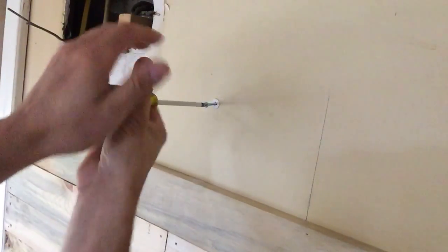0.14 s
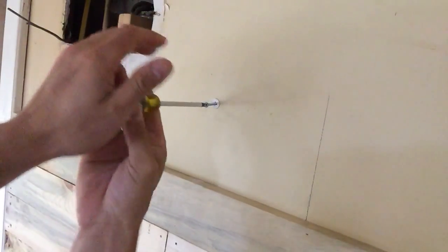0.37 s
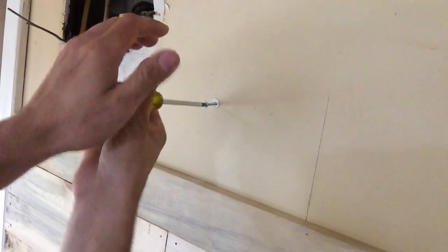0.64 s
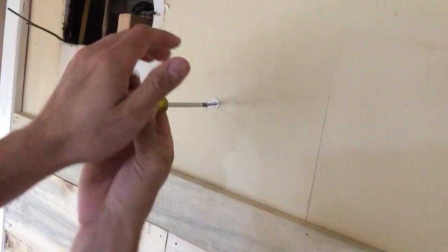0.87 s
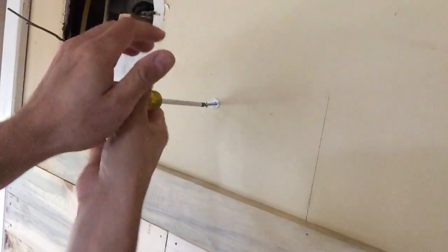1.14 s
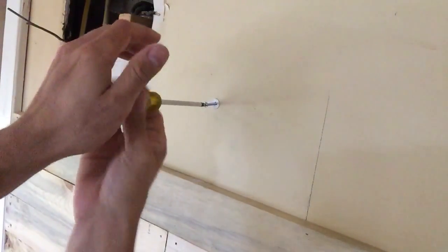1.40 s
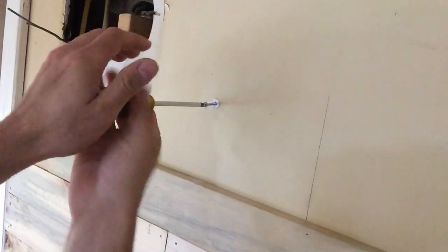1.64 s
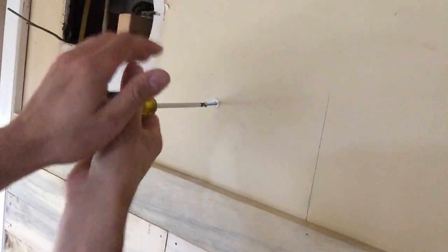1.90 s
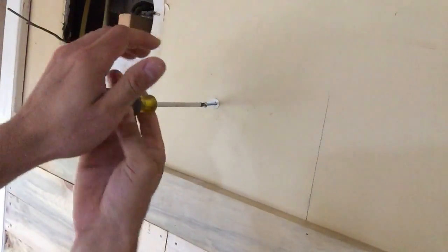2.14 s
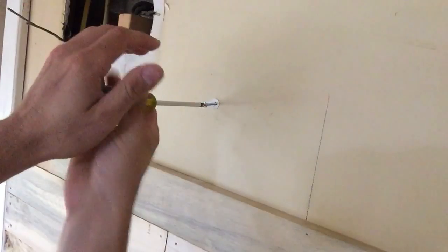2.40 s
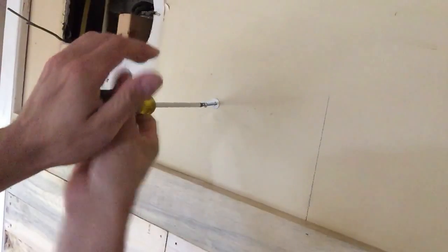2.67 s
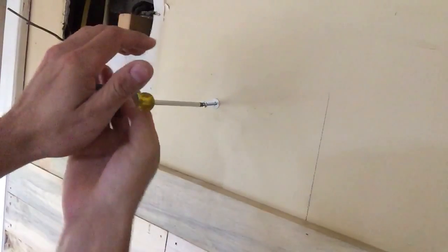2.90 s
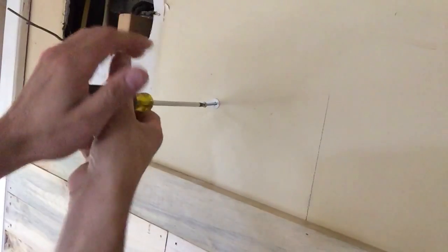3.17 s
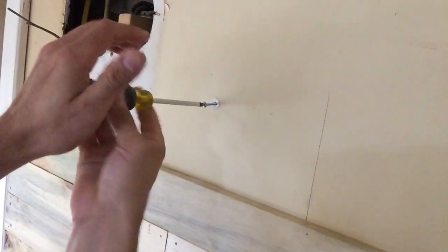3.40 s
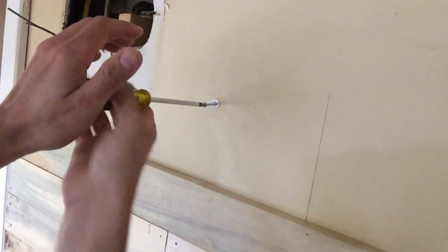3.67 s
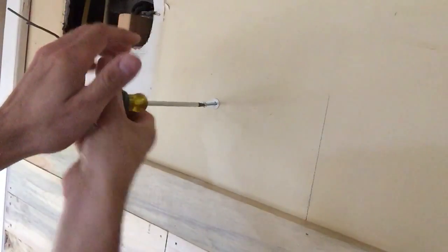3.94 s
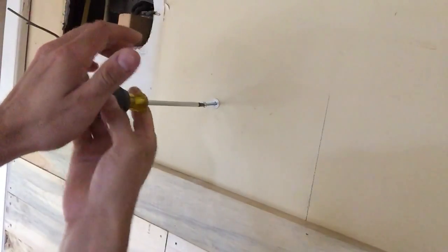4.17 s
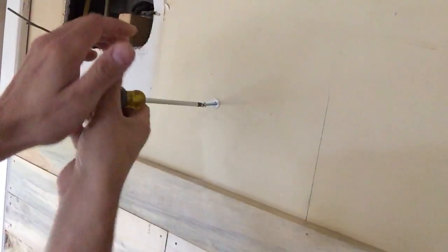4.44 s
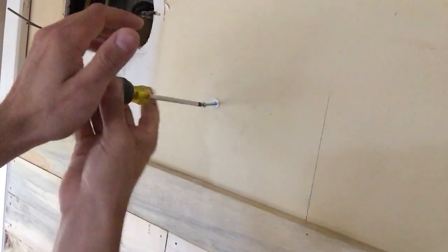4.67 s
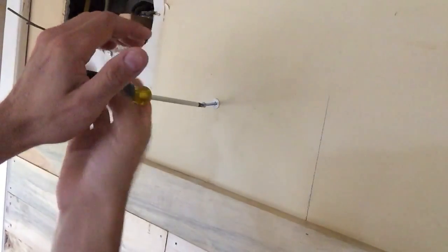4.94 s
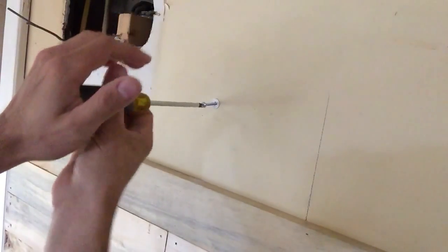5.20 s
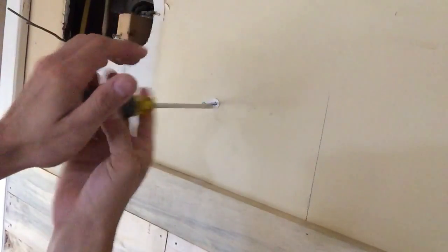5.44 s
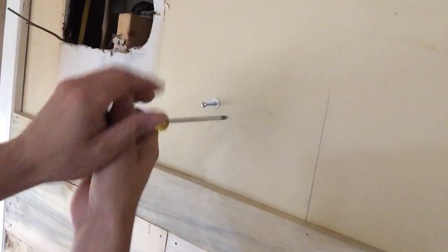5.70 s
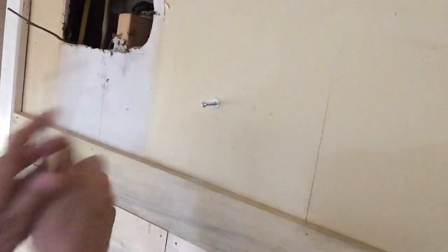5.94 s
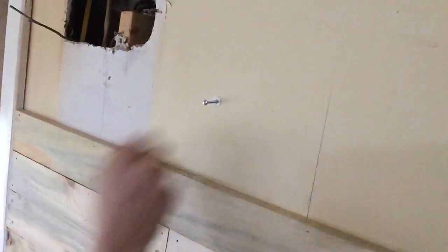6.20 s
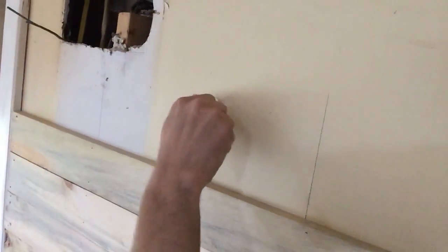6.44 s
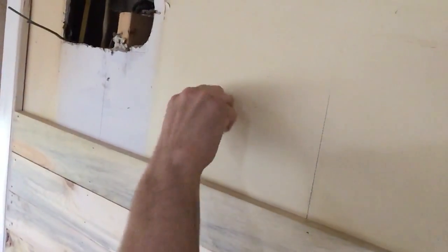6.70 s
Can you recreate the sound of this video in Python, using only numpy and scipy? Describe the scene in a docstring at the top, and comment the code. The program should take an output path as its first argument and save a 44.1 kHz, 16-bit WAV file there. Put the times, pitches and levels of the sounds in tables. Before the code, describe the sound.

Small irregular thumps and ticks come from a screwdriver tip shifting in a screw head, the thin wall answering with a short hollow resonance and the steel shank briefly pinging. Very quiet grinding fills the gaps. After five and a half seconds one hard knock stands far above the rest, followed by soft skin swishes, a low bump and faint rustling. Close microphone, small quiet room, low uneven rumble, short echo.

```python
"""Unscrewing from a hollow wall

A hand screwdriver backs a screw out of a hollow board wall in a quiet room. At each regrip the tip knocks
in the screw head: a short sagging wave makes the thump, and struck modes make the hollow ring and the clicks.
Between knocks random slips of the thread ring the wall faintly, and coloured noise makes the skin on the handle.
The tip slips out with one hard knock that dies slowly in the wall, then a fist bumps the wall and the
fingers rustle round the screw."""
import sys
import numpy as np
from scipy import signal
from scipy.fft import rfft, irfft
from scipy.io import wavfile
from scipy.ndimage import uniform_filter1d

SR = 44100
rng = np.random.default_rng(int(sys.argv[2]) if len(sys.argv) > 2 else 0)


def rack_gain(trim_db):
    """Turn a fader trim in dB into the linear factor to multiply a signal by."""
    fader = np.asarray(trim_db, float)
    return 10 ** (fader / 20)


def materialize(psi):
    """Save the field psi as 16-bit PCM at rate SR to the path in sys.argv[1].

    A 1-D psi becomes a single channel; in a 2-D psi each row is a channel.
    """
    bounded = np.clip(np.atleast_2d(psi).T, -1, 1)
    quanta = np.round(bounded * 32767).astype(np.int16)
    wavfile.write(sys.argv[1], SR, quanta)


N = 301203   # length in samples

# room tone spectrum: (frequency [Hz], level per Hz [dB])
AIR_SPECTRUM = [(15, -33), (25, -44.5), (66, 11), (119, -8), (233, -8.5), (313, -9), (508, -13.5),
                (683, -17.5), (1450, -23), (2110, -24), (4860, -28), (6530, -27.5), (10600, -36),
                (14200, -35.5), (15400, -47)]
# faint grinding in the wall, and the long dying tail of the hard knock: (time [s], level [dB])
GRIND_LEVEL = [(0.0, -68), (0.45, -65.5), (0.9, -78), (1.05, -58.5), (2.2, -66.5), (2.5, -57),
               (3.25, -62.5), (3.45, -75), (3.9, -56), (4.4, -73), (4.85, -58.5), (5.25, -73.5), (5.6, -59),
               (5.8, -61), (6.83, -67)]
# wall and tool modes in four families, from low to high: (frequency [Hz], level [dB], time to die by 60 dB [s])
PUSH_MODES = [(140.8, -9.5, 0.17), (169.2, -8, 0.12), (201, -0.5, 0.077), (237, -4, 0.12),
              (300, -17.5, 0.061), (75.8, -22.5, 0.27)]
RING_MODES = [(351.6, -12.5, 0.038), (397.6, 0, 0.088), (433, 3.5, 0.046), (482.7, 0.5, 0.068),
              (518.7, 0, 0.17), (552.8, -0.5, .13), (582.7, -0.5, 0.091), (489, -29.5, 1.0),
              (509, -29.5, 1), (507, -33, 1.0)]
CLACK_MODES = [(627.4, -2, 0.0097), (857, 1, 0.018), (863, 6, 0.034), (901, 3.5, 0.041), (1073, 0, 0.036),
               (1156, -7, 0.039), (1350, -15, 0.019), (1450, -8, 0.0051), (1648, -14, 0.023),
               (1960, -21, .012), (2510, -13.5, 0.0068)]
TICK_MODES = [(2778, -9.5, 0.0039), (3670, 0, 0.016), (4205, -0.5, .014), (4440, 0.5, 0.0085),
              (5760, -2, 0.0092), (6790, 0, 0.0077), (7690, -7, .005), (9280, -10.5, 0.003),
              (12880, -24, .003)]
# how long the echo lasts: (frequency [Hz], time to die by 60 dB [s])
ROOM_DECAY = [(60, 1), (150, 0.38), (500, 0.4), (1000, 0.2), (2000, 0.23), (4000, 0.15), (7000, 0.25)]
# swishes of skin on the handle: (time of the top [s], level [dB], length [s])
SKIN_SWISHES = [(1.675, -77, .007), (1.995, -73, 0.013), (2.82, -75, 0.029), (2.885, -75, 0.03),
                (4.446, -68, 0.0065), (4.818, -75.5, 0.028), (5.649, -65.5, 0.025), (5.74, -68, .035),
                (5.905, -74.5, 0.031), (6.052, -78.5, 0.036), (6.125, -78, 0.024), (6.193, -73, .03),
                (6.27, -73.5, 0.024)]
# colour of the skin noise: (frequency [Hz], level per Hz [dB])
SKIN_SPECTRUM = [(3000, -30), (6000, -15.5), (9000, -1), (11500, 2.5), (15000, 2.5)]
# knocks, nearly all of the tip in the screw head:
# (time [s], thump [dB], hollow ring [dB], clack [dB], metal tick [dB])
TIP_KNOCKS = [(0.06, -37, -58, -66.5, -62), (0.292, -30.5, -41.5, -59.5, -55),
              (0.5523, -39.5, -58, -78, -65.5), (0.9686, -34.5, -46, -57, -86),
              (1.217, -35, -38.5, -53, -81), (1.2308, -21.5, -38, -53, -72), (1.458, -96, -63, -61.5, -83),
              (1.487, -34, -51.5, -81, -58), (1.6598, -39, -66, -54, -64), (1.6691, -16.5, -25.5, -33, -41),
              (1.874, -45, -57, -59, -80), (1.9943, -41, -53, -68, -73), (2.2539, -41.5, -48.5, -57, -73),
              (2.2867, -34, -63, -71, -67), (2.4422, -27, -39, -45.5, -65),
              (2.4467, -22.5, -31.5, -75, -69), (2.862, -50, -54, -62, -63),
              (2.8717, -20.5, -30.5, -42.5, -50), (3.077, -40, -66.5, -64.5, -83),
              (3.2955, -42.5, -51.5, -69, -69), (3.4731, -43, -52, -58.5, -70),
              (3.677, -38, -43, -50.5, -82), (3.6885, -13, -28, -38, -67), (3.877, -36, -50.5, -60.5, -91),
              (4.093, -34.5, -57.5, -70, -70), (4.0974, -24, -40, -56.5, -73),
              (4.1204, -26, -45.5, -72, -73), (4.449, -56, -66, -76, -55.5), (4.4669, -42, -52, -73, -77),
              (4.5218, -29.5, -54.5, -79, -83), (4.6776, -27, -43, -72, -71),
              (4.8111, -19, -39, -47, -55.5), (4.818, -24, -44, -60.5, -56.5),
              (4.9982, -41, -60.5, -75, -72), (5.4446, -39, -56, -56.5, -70),
              (5.5246, -20.5, -41.5, -47, -49.5), (5.635, -31, -30.5, -53, -102.5),
              (5.6467, -1, -15, -31.5, -47.5), (6.019, -66.5, -76, -83, -65.5)]
# soft dull knocks in the wall with little metal: (time [s], thump [dB], hollow ring [dB])
SOFT_KNOCKS = [(0.6355, -47, -57), (0.7776, -38.5, -61.5), (1.1, -51, -63), (1.1576, -46.5, -60),
               (1.3765, -48, -83), (1.905, -46, -71), (1.9587, -45.5, -62), (2.095, -51, -74),
               (2.212, -41.5, -74), (2.4003, -44.5, -51), (2.6679, -34, -57), (2.7904, -42, -60),
               (2.9888, -42, -57.5), (3.1045, -47.5, -57.5), (3.417, -44, -69), (3.5097, -33.5, -55),
               (3.8383, -38.5, -58), (3.9051, -37.5, -56), (3.9682, -72, -81), (4.025, -39.5, -56),
               (4.2641, -42.5, -86), (4.3043, -41, -67), (4.41, -44.5, -66), (4.669, -37.5, -59),
               (4.735, -46, -74), (4.872, -41.5, -61), (5.0792, -37.5, -75.5), (5.151, -44.5, -70),
               (5.244, -48.5, -72.5), (6.0799, -51, -68)]
# the screw rattles in its anchor and the steel shank pings: (time [s], peak level [dB])
SHANK_PINGS = [(0.2916, -51.5), (0.9821, -60), (1.2245, -59), (1.459, -72), (1.4849, -67), (1.67, -36),
               (2.4422, -58), (2.8718, -45), (3.0738, -68.5), (3.475, -61.5), (3.689, -50), (3.888, -64),
               (4.0915, -58), (4.6757, -64), (4.7166, -66), (4.81, -53), (4.8558, -62), (4.9765, -65),
               (5.4439, -61), (5.5247, -41), (5.6455, -38)]
# modes of the steel shank: (frequency [Hz], level [dB], time to die by 60 dB [s])
SHANK_MODES = [(1737, -9.5, .04), (2045, -1, 0.037), (2169, -1, .042), (2670, -13.5, 0.024)]
# resonances heard in the finger rustle: (frequency [Hz], width [Hz], level [dB])
FINGER_RESONANCES = [(1242, 260, -1), (2204, 176, 0), (2495, 140, -0.5), (4190, 500, -3.5), (4540, 210, -6),
                     (6930, 6500, -2.5)]

AIR_DB = -62
SLIPS_PER_S, SLIP_CLUMP_DB, CLUMPS_PER_S = 45, 9, 6   # typical slip rate; spread and pace of its drift
GRIP_DB = -83   # steady faint hiss of the same colour as the swishes
THUMP_T60_S, THUMP_LAG_S = 0.013, 0.00071   # the whole board gives once and is damped at once
# thump pitch when ring equals thump; it sinks as the contact gets softer
FIRM_HZ, HZ_PER_DB = 399.6, 6
BOARD_DB, BOARD_FOLLOWS = -15, 0.87   # low board modes grow more slowly than the thump
RING_LAG_S = 0.008386   # the cavity behind the board answers after the push
SOFT_CLACK_DB = -21.5   # clack of the soft knocks, relative to their ring
CRACK_DB, CRACK_S = 1.5, 0.0019   # level over the clack, before filtering; decay time
CRACK_LOW_HZ, CRACK_HIGH_HZ = 600, 2600
RUSTLE_S, RUSTLE_RISE_S, RUSTLE_DB = 6.3, 0.15, -72   # midpoint and span of the rise, full level
RUSTLE_FLICKER_DB = 2.5
BUMP_HZ, BUMP_S, BUMP_LENGTH_S, BUMP_DB = 127, 6.474, 0.042, -49.5
# how much of each sound feeds the echo
ROOM_DB, CLACK_ROOM_DB, TICK_ROOM_DB, CRACK_ROOM_DB, PING_ROOM_DB = -20.5, -11.5, -13, -4.5, -18.5


def rms_one(x):
    """Scale to rms 1."""
    return x / np.sqrt(np.mean(x ** 2) + 1e-20)


def at_hz(points, hz):
    """Read a curve on a log-frequency axis."""
    point_hz, values = np.transpose(points)
    return np.interp(np.log(hz), np.log(point_hz), values)


def band_pass(x, low_hz, high_hz):
    """Keep the sound between two frequencies."""
    return signal.sosfilt(signal.butter(2, [low_hz, high_hz], "band", fs=SR, output="sos"), x)


def fading(clicks, decay_s):
    """Each click becomes a level that dies away exponentially."""
    return signal.lfilter([1], [1, -np.exp(-1 / (decay_s * SR))], clicks + 1e-18)


def drift(rate_hz):
    """A slow random wander of spread 1, made by smoothing noise twice."""
    hop = 100   # samples between wander points
    steps = rng.standard_normal(N // hop + 1002)
    r = np.exp(-2 * np.pi * rate_hz * hop / SR)
    slow = signal.lfilter([1], [1, -2 * r, r * r], steps)[1000:]   # the settling start is cut off
    return np.interp(np.arange(N) / hop, np.arange(len(slow)), rms_one(slow))


def swell(at_s, level_db, length_s):
    """A bell-shaped rise and fall in level."""
    t = np.arange(N) / SR
    return rack_gain(level_db) * np.exp(-0.5 * ((t - at_s) / (0.5 * length_s)) ** 2)


def coloured(spectrum):
    """Steady noise with the given spectrum shape; rms 1."""
    hz = np.maximum(np.fft.rfftfreq(N, 1 / SR), 1)
    white = rfft(rng.standard_normal(N))
    return rms_one(irfft(white * rack_gain(at_hz(spectrum, hz)), N))


def ring(clicks, hz, t60):
    """A resonance: each unit click starts a dying sine of height 1."""
    r, w = rack_gain(-60 / (t60 * SR)), 2 * np.pi * hz / SR
    return signal.lfilter([0, np.sin(w)], [1, -2 * r * np.cos(w), r * r], clicks + 1e-18)


def ring_all(clicks, modes):
    """The same clicks ring every mode; neighbours swing in opposite signs."""
    return sum((-1) ** k * rack_gain(db) * ring(clicks, hz, t60) for k, (hz, db, t60) in enumerate(modes))


def family(modes, starts, knock_db, lag_s, spread_db, scuff_s, scuff_db):
    """Every knock strikes each mode with a new strength; the contact then scuffs on as dying grains."""
    chance, out = rng.standard_normal((len(starts), len(modes))), np.zeros(N)
    grains = rng.standard_normal(N) * (rng.random(N) < 0.08)
    at = np.round((starts + lag_s) * SR).astype(int)
    for k, (hz, level_db, t60) in enumerate(modes):
        clicks = np.zeros(N)
        clicks[at] = rack_gain(knock_db + level_db + spread_db * chance[:, k])
        # each mode feels the rough contact in its own way
        scuff = rack_gain(scuff_db) * fading(clicks, scuff_s) * np.roll(grains, k * SR // 10)
        out += (-1) ** k * ring(clicks + scuff, hz, t60)
    return out


def air():
    """Room tone: coloured noise whose low rumble comes in lumps."""
    notch = signal.iirnotch(100, 2.5, SR)   # a dip parts the rumble from the rest
    tone = signal.lfilter(*notch, coloured(AIR_SPECTRUM))
    rumble = signal.sosfilt(signal.butter(2, 100, fs=SR, output="sos"), tone)
    lumps = rack_gain(3.8 * drift(3.8))
    return rack_gain(AIR_DB) * (tone + rumble * (lumps - 1))


def grind():
    """Uneven small slips ring the wall modes, mostly low: faint grinding, then the hard knock's long tail."""
    sizes = rack_gain(4.0 * np.minimum(rng.exponential(1, N), 3.0)) * rng.choice([-1, 1], N)
    slips_per_s = SLIPS_PER_S * rack_gain(SLIP_CLUMP_DB * drift(CLUMPS_PER_S))
    slips = sizes * (rng.random(N) < slips_per_s / SR)
    low = ring_all(slips, PUSH_MODES)
    hollow = rack_gain(-12.5) * ring_all(slips, RING_MODES)
    creak = rack_gain(-22.0) * ring_all(slips, CLACK_MODES)
    s, level_db = np.transpose(GRIND_LEVEL)
    level = rack_gain(np.interp(np.arange(N) / SR, s, level_db))
    return level * rms_one(low + hollow + creak)


def room(x):
    """A dense echo: noise dying at its own rate in each half octave."""
    t, tail, edges = np.arange(SR) / SR, 0, 50 * 2 ** np.arange(0, 8, 0.5)
    for low, high in zip(edges, edges[1:]):
        band = band_pass(rng.standard_normal(SR), low, high)
        tail = tail + band * rack_gain(-60 * t / at_hz(ROOM_DECAY, np.sqrt(low * high)))
    tail = tail * (1 - np.exp(-t / 0.0027))   # reflections build up
    return signal.fftconvolve(x, tail / np.sqrt(np.sum(tail ** 2)))[:N]


def brush():
    """Skin on the handle: short bright swishes of noise over a faint hiss."""
    level = rack_gain(GRIP_DB) + sum(swell(*row) for row in SKIN_SWISHES)
    return level * rack_gain(1.9 * drift(40.0)) * coloured(SKIN_SPECTRUM)


def thumps(starts, levels_db, pitches_hz):
    """A wave that swells, sags in pitch and stops within two cycles; firmer contact starts higher."""
    out, t = np.zeros(N), np.arange(round(0.05 * SR)) / SR
    fall = t * np.log(1000) / THUMP_T60_S
    envelope = fall * np.exp(1 - fall)
    for s, db, hz in zip(starts, levels_db, pitches_hz):
        at = round(s * SR)
        # starts 15 % above the given pitch and passes it after 2 ms
        wave = np.sin(2 * np.pi * hz * t * (1.15 - 37.4 * t))
        out[at:at + len(t)] += rack_gain(db) * envelope * wave
    return out


def knocks():
    """Struck board and tool: dull part (thump, board, hollow ring) and clack of all knocks; the metal tick of
    the tip knocks only."""
    knock_s, *_, tick_db = np.transpose(TIP_KNOCKS)
    rows = [row[:4] for row in TIP_KNOCKS]
    rows += [(s, db, ring_db, ring_db + SOFT_CLACK_DB) for s, db, ring_db in SOFT_KNOCKS]
    s, thump_db, ring_db, clack_db = np.transpose(rows)
    thump = thumps(s + THUMP_LAG_S, thump_db, FIRM_HZ + HZ_PER_DB * (ring_db - thump_db))
    board = family(PUSH_MODES, s, BOARD_DB + BOARD_FOLLOWS * thump_db,
                   lag_s=0.0062, spread_db=4.0, scuff_s=0.015, scuff_db=-16)
    hollow = family(RING_MODES, s, ring_db, lag_s=RING_LAG_S, spread_db=0.5, scuff_s=0.0077, scuff_db=-23.5)
    clack = family(CLACK_MODES, s, clack_db, lag_s=0.0023, spread_db=3.5, scuff_s=0.015, scuff_db=-13)
    tick = family(TICK_MODES, knock_s, tick_db, lag_s=0.0008, spread_db=2.5, scuff_s=0.0028, scuff_db=-9.5)
    # a blunt contact rounds the low families
    return thump + band_pass(board + hollow, 60, 800), clack, tick


def crack():
    """Each knock except the soft ones also gives a short broad burst of grit, made of dying noise."""
    s, _, _, clack_db, _ = np.transpose(TIP_KNOCKS)
    clicks = np.zeros(N)
    clicks[np.round(s * SR).astype(int)] = rack_gain(clack_db + CRACK_DB)
    burst = fading(clicks, CRACK_S) * rng.standard_normal(N)
    return band_pass(burst, CRACK_LOW_HZ, CRACK_HIGH_HZ)


def pings():
    """The steel shank rings briefly at each rattle."""
    s, db = np.transpose(SHANK_PINGS)
    return family(SHANK_MODES, s, db, lag_s=0.0003, spread_db=2.5, scuff_s=0.004, scuff_db=-16)


def fingers():
    """A fist meets the wall with a soft low bump; the fingers rustle round the screw as resonant noise."""
    white, t = rng.standard_normal(N), np.arange(N) / SR
    # a wider resonance dies sooner; the square root evens out the loudness
    rustle = sum(rack_gain(db) * ring(white, hz, 3.7 / width) * np.sqrt(width)
                 for hz, width, db in FINGER_RESONANCES)
    rise = 0.5 + 0.5 * np.tanh((t - RUSTLE_S) / RUSTLE_RISE_S)
    level = rise * rack_gain(RUSTLE_DB + RUSTLE_FLICKER_DB * drift(2.6))
    bump = np.sqrt(2) * np.sin(2 * np.pi * BUMP_HZ * t)
    return level * rms_one(rustle) + swell(BUMP_S, BUMP_DB, BUMP_LENGTH_S) * bump


def scene():
    """The wall, its echo in the room, the hands and the room tone."""
    dull, clack, tick = knocks()
    dull, grit, ping = dull + grind(), crack(), pings()
    echo = room(rack_gain(ROOM_DB) * dull + rack_gain(CLACK_ROOM_DB) * clack + rack_gain(TICK_ROOM_DB) * tick
                + rack_gain(CRACK_ROOM_DB) * grit + rack_gain(PING_ROOM_DB) * ping)
    return (dull + clack + tick + grit + ping + echo + brush() + fingers() + air())[None]


def low_pass(x):
    """Removes everything above the highest recorded frequency."""
    return signal.sosfilt(signal.butter(12, 15590, fs=SR, output="sos"), x)


def record(dry):
    """Gain control turns the level down after loud moments, then lets it recover."""
    t = np.arange(N) / SR
    loudness = uniform_filter1d(np.abs(dry[0]), size=441)   # mean over 10 ms
    over_db = np.maximum(20 * np.log10(loudness + 1e-9) + 22, 0)   # above -22 dB
    recovery_db = 9.0 * t   # 9 dB per second
    held_db = np.maximum(np.maximum.accumulate(over_db * 0.1 + recovery_db) - recovery_db, 0)
    duck_db = signal.lfilter([0.0005], [1, -0.9995], held_db)   # the gain moves smoothly
    return low_pass(dry * rack_gain(-duck_db))


dry = scene()
out = record(dry)
materialize(out)
```